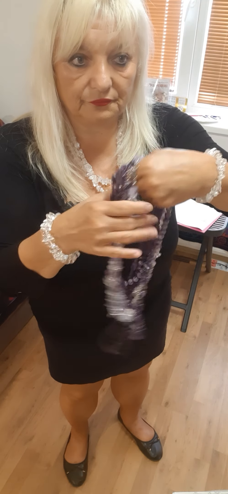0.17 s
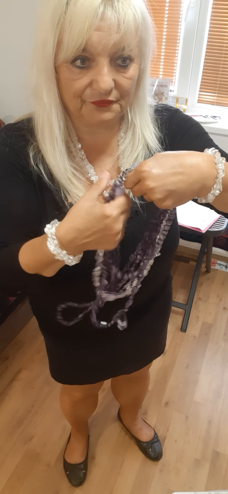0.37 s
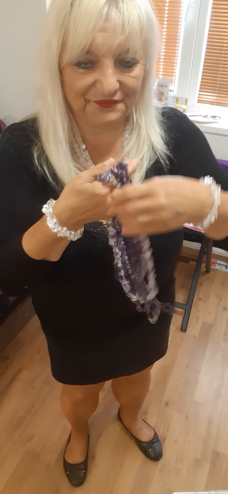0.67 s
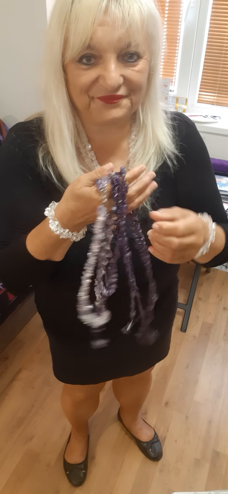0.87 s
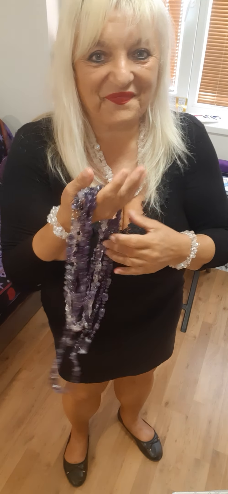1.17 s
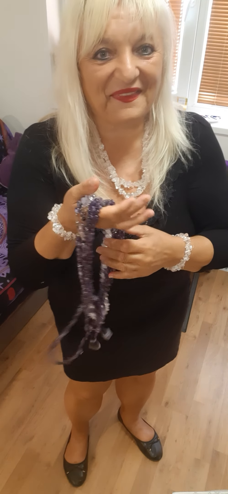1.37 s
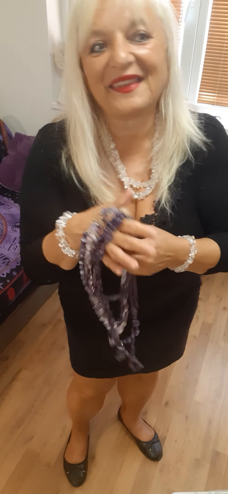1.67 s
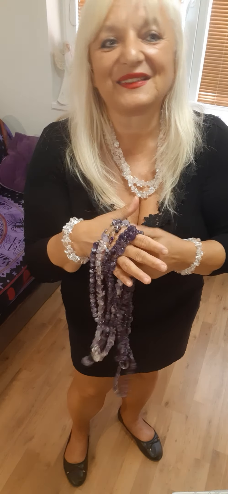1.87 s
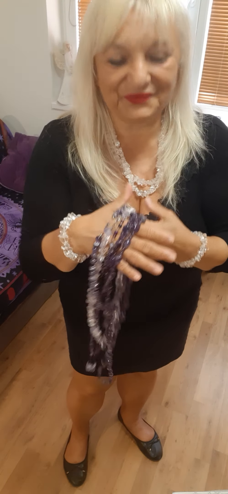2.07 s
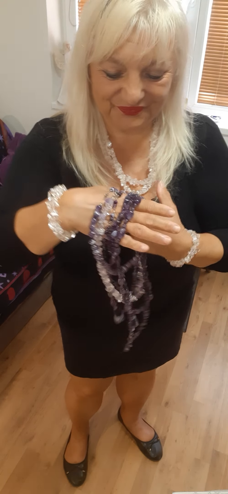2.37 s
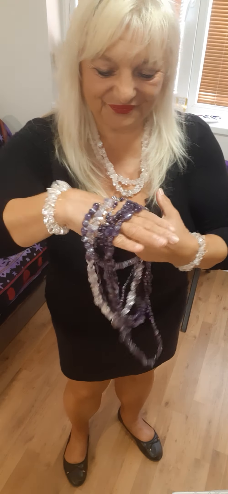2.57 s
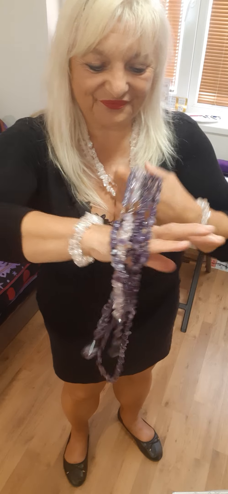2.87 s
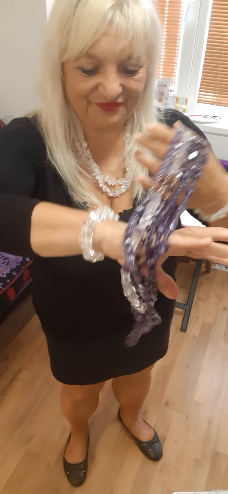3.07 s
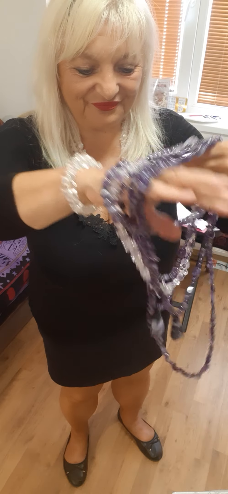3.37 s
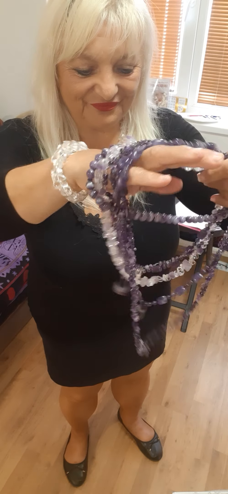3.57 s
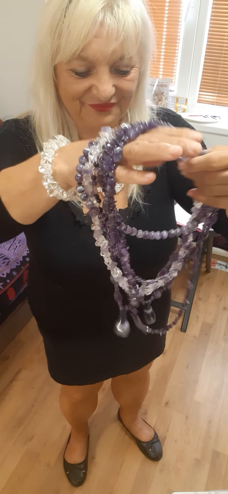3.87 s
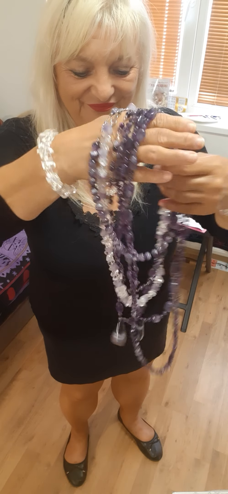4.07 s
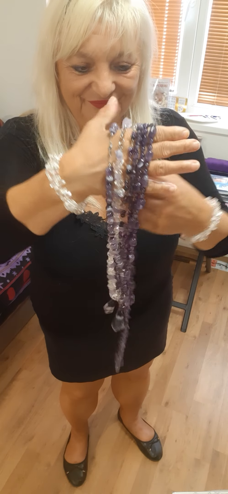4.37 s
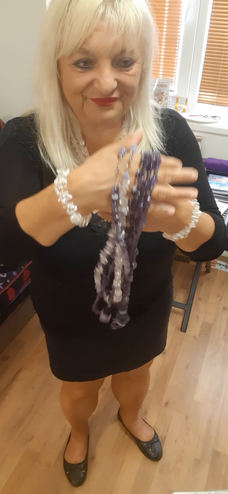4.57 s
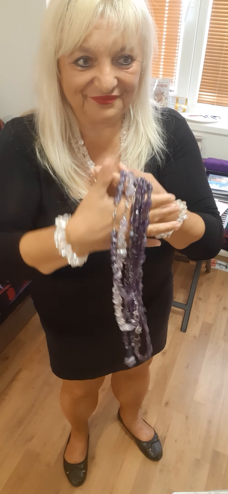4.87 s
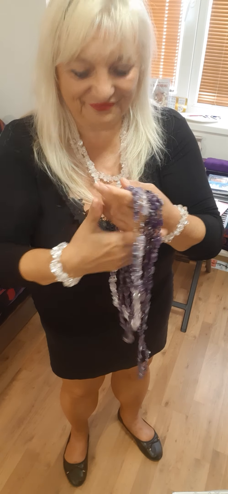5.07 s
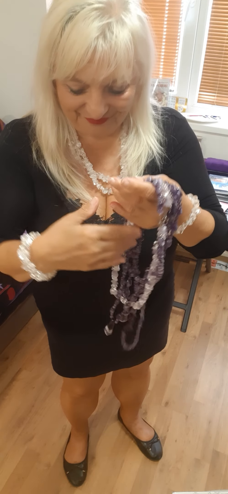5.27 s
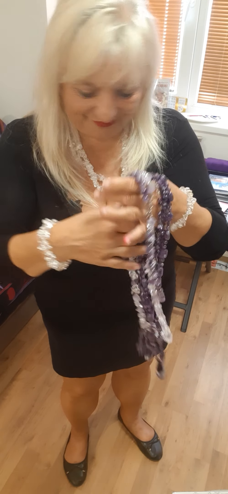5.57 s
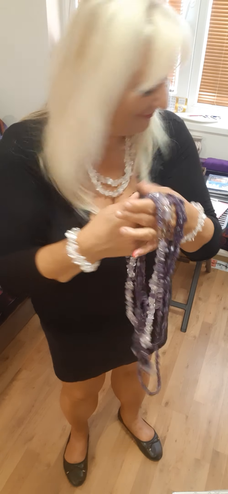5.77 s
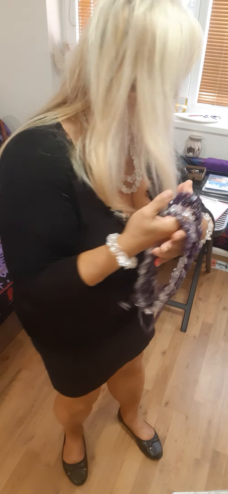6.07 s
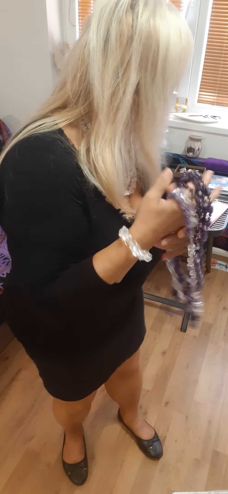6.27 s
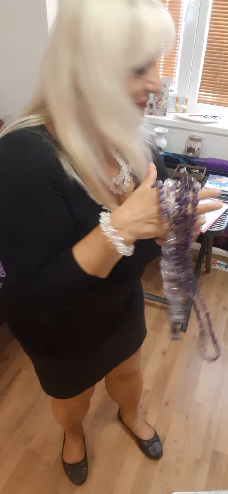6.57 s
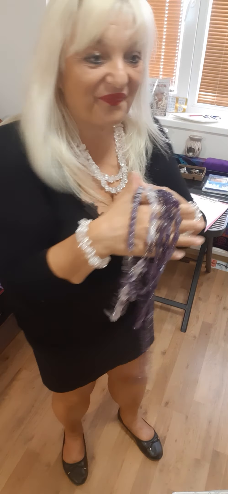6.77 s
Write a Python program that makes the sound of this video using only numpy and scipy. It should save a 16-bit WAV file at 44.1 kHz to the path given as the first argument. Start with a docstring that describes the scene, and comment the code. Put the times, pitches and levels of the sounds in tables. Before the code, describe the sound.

Strands of small stone beads rattle and clink brightly from hand to hand, close up in a quiet, lightly echoing living room.

```python
"""Strands of small stone beads are passed from hand to hand in a quiet living room, close to a phone.
Sliding over the fingers and swinging give a rattle of many tiny contacts, with harder clinks among them.
Each contact is a sharp tick with short rings and scattered noise; a metal clasp pings as a sum of sines.
Arms rub softly over cloth as shaped noise; room echoes and a low rumble of coloured noise lie behind."""
import sys
import numpy as np
from scipy import signal
from scipy.fft import rfft, irfft, next_fast_len
from scipy.io import wavfile

SR = 44100
rng = np.random.default_rng(int(sys.argv[2]) if len(sys.argv) > 2 else 0)


def log_audio(samples):
    """Write samples as a 16-bit WAV file to the path given in sys.argv[1]."""
    # one column per channel
    frames = np.atleast_2d(samples).T
    # limit to full scale, then quantise
    limited = np.clip(frames, -1, 1)
    pcm = np.round(limited * 32767).astype(np.int16)
    wavfile.write(sys.argv[1], SR, pcm)


N = 304272  # length of the scene in samples

# swings that throw the strands against each other: start t/s, length/s, rattle level/dB, heft/dB
# (heft is the extra weight of big stones)
STRAND_SWINGS = [(0.241, 0.039, -38.5, 5), (.403, 0.18, -46.5, 2), (0.688, 0.049, -40, 11.5),
                 (0.988, 0.13, -40.5, 1), (1.594, 0.21, -46, 0.5), (1.871, 0.17, -45, -2.5),
                 (2.2, 0.069, -50.5, 16), (2.353, .032, -46, 1.5), (2.772, 0.018, -41, -2),
                 (2.976, 0.18, -53, -1), (3.11, 0.066, -49.5, 12.5), (3.28, 0.048, -56.5, 1),
                 (3.589, 0.016, -53.5, 2), (3.688, 0.043, -49, -4), (3.91, 0.29, -51, -2.5),
                 (4.135, 0.011, -46, 0), (4.342, .012, -44, -1), (4.533, 0.066, -52.5, 6),
                 (4.7, 0.082, -52, 0), (4.815, 0.064, -44.5, 0.5), (5.002, 0.14, -46, -0.5),
                 (5.287, 0.015, -44.5, -8), (5.594, 0.14, -51.5, 0.5), (5.793, 0.11, -43, -1.5),
                 (6.042, 0.071, -51, 11.5), (6.272, 0.032, -47, -4.5), (6.48, 0.015, -46.5, -5),
                 (6.761, 0.018, -38.5, 1)]
SWING_ATTACK_S = 0.036


def undb(db):
    """Turn decibels into gain."""
    return 10 ** (np.asarray(db) / 20)


def curve(rows, t, axis=1):
    """Read one column of a table at times t, with straight lines between its rows."""
    rows = np.array(rows)
    return np.interp(t, rows[:, 0], rows[:, axis])


def colour(points, hz):
    """Gain at the given frequencies, from a spectrum of (f/Hz, level/dB) points."""
    f, db = np.transpose(points)
    return undb(np.interp(np.log(hz + 1), np.log(f), db))


def noise(points, size=N):
    """Noise of a given colour, with an rms level of 1."""
    n = next_fast_len(size)
    spectrum = rfft(rng.standard_normal(n))
    spectrum *= colour(points, np.fft.rfftfreq(n, 1 / SR))
    x = irfft(spectrum, n)[:size]
    return x / x.std()


def room_tone(level_db=-76, pan_db=-3, alike_hz=300):
    """Steady low rumble of the room; its bass is more alike on the two sides than its treble."""
    # colour of the rumble: f/Hz, relative level/dB
    rumble_colour = [(20, -11), (45, -10), (60, 4), (85, 1.5), (150, 1), (200, -4.5), (350, -9.5),
                     (700, -11), (1500, -17.5), (4000, -22.5), (15000, -21.5)]
    mid, side = noise(rumble_colour), noise(rumble_colour)
    bass_filter = signal.butter(1, alike_hz, fs=SR, output="sos")
    side = side - .5 * signal.sosfilt(bass_filter, side)
    balance_db = np.array([[pan_db], [-pan_db]]) / 2
    return np.array([mid + side, mid - side]) * undb(level_db + balance_db)


def room_response(wet_db=-4.0, t60_s=0.56, gap_s=0.00052, early_db=-10, count=8, size=24000):
    """A few early bounces off floor and walls, together with a dense tail that dies away."""
    t = np.arange(size) / SR
    decay = np.exp(-np.log(1000) * t / t60_s)
    onset = np.clip(t / gap_s - .5, 0, 1)
    tail = rng.standard_normal(size) * decay * onset
    tail *= undb(wet_db) / np.linalg.norm(tail)
    bounces_s = rng.uniform(.005, .03, count)
    signs = rng.choice([-1, 1], count)
    tail[(bounces_s * SR).astype(int)] += undb(early_db) * signs / np.sqrt(count)
    return tail


def room(x, size=4096):
    """The beads keep moving, so about every tenth of a second their sound takes new paths to the walls."""
    out = np.zeros((2, N + SR))
    for start in range(0, N, size):
        for channel in range(2):
            wet = signal.fftconvolve(x[channel, start:start + size], room_response())
            out[channel, start:start + len(wet)] += wet
    return out[:, :N]


def rubs(edge_s=0.014, skirt_db=-14):
    """Hands and arms rub softly over cloth: one broad hump of noise with a little hiss above it."""
    # the rubs: start t/s, end t/s, level/dB before the fades, centre f/Hz, hiss relative to the hump/dB
    rub_rows = [(0.153, .605, -81.5, 277, -6), (3.038, 3.112, -72, 810, -13), (4.749, 5.094, -80, 310, -19),
                (6.024, 6.123, -64, 1060, -6.5)]
    t, out = np.arange(SR) / SR, np.zeros((2, N + SR))
    for start, end, db, hz, hiss_db in rub_rows:
        hump = [(hz / 4, -40), (hz / 2.0, skirt_db), (hz, 0),
                (hz * 1.75, max(hiss_db, skirt_db)), (hz * 3, hiss_db), (hz * 10, hiss_db - 35)]
        fade_in = np.clip(t / edge_s, 0, 1)
        fade_out = np.sqrt(np.clip(1 - t / (end - start), 0, 1))
        rustle = np.array([noise(hump, size=SR), noise(hump, size=SR)])
        out[:, int(start * SR):][:, :SR] += undb(db) * fade_in * fade_out * rustle
    return out[:, :N]


def clasp(pan_db=-4):
    """A small metal part rings thinly when a bead taps it: several pure tones, each with its own decay."""
    # tones of the clasp: f/Hz, relative level/dB, time to fall by 60 dB/s
    clasp_modes = [(7350, -11, 0.25), (9060, 0, 0.18), (14300, -5, 0.16), (15400, -3, 0.61)]
    # taps on the clasp: t/s, level/dB (the left side is then turned down by pan_db)
    tap_rows = [(3.922, -59.5), (4.154, -55), (4.166, -54)]
    out, t = np.zeros(N), np.arange(SR) / SR
    ping = sum(undb(db - 60 * t / t60) * np.sin(2 * np.pi * hz * t) for hz, db, t60 in clasp_modes)
    for start, db in tap_rows:
        out[int(start * SR):][:SR] += undb(db) * ping
    return out * undb([[pan_db], [0]])


def motion(t, settle_db_per_s=260, light_slide_db=-63, heft_per_db=0.11):
    """Rattle level and heft (dB) at times t: sliding plus swings that rise fast, hold and settle."""
    # sliding of the strands over the fingers: t/s, rattle level/dB
    slide_rows = [(0, -57.5), (.17, -47), (.6, -45.5), (1.21, -43), (1.55, -45.5), (1.86, -62), (2.08, -46),
                  (2.54, -50.5), (2.74, -68), (2.99, -74), (3.53, -53), (3.88, -72.5), (4.07, -54.5),
                  (4.87, -56.5), (5.37, -60), (5.82, -49.5), (6.24, -49.5), (6.9, -53.5)]
    start, length, db, swing_heft = np.transpose(STRAND_SWINGS)[:, :, None]
    age = t - start
    rise = np.clip(age / SWING_ATTACK_S, 0, 1)
    settle_db = settle_db_per_s * np.maximum(age - length, 0)
    swing_power = rise * undb(db - settle_db) ** 2
    slide_db = curve(slide_rows, t)
    slide_power = undb(slide_db) ** 2
    # faster sliding stirs bigger stones: heft is zero at light_slide_db and grows with the level
    slide_heft = heft_per_db * (slide_db - light_slide_db)
    power = slide_power + swing_power.sum(0)
    heft = (slide_power * slide_heft + (swing_power * swing_heft).sum(0)) / power
    return 10 * np.log10(power), heft


def contacts(times, db, heft_db, pan_db, ring_s=0.0038, ring=0.49, scatter=0.54,
             echo_s=0.000522, echo=0.25, size=512):
    """Stone meets stone: a sharp tick, three short rings of its own, and scatter off nearby beads."""
    # colour of a bead contact: f/Hz, relative level/dB
    stone_colour = [(300, -59), (1000, -27), (1700, -28.5), (2100, -24), (2800, -21.5), (3600, -12),
                    (4400, -6), (6500, -4), (7900, -2), (8600, -7.5), (10200, -4), (11300, 2.5), (14000, 4),
                    (15700, 5)]
    count, t, hz = len(times), np.arange(size) / SR, np.fft.rfftfreq(size, 1 / SR)
    chance = rng.standard_normal((count, size + 8))
    wave = scatter * chance[:, :size] * np.exp(-t / .0011)
    wave[:, 0] += 1  # the tick
    for k in range(3):
        pitch_hz = 11000 * np.exp(.28 * chance[:, size + k, None]).clip(.5, 1.9)
        t60_s = ring_s * np.exp(.35 * chance[:, size + 3 + k, None])
        wave += ring * np.cos(2 * np.pi * pitch_hz * t) * np.exp(-np.log(1000) * t / t60_s)
    # big stones knock with more weight, mostly between 2 and 6 kHz
    low_share = np.interp(hz, [1000, 2200, 4500, 11000], [0, 1.3, .8, 0])
    weight = undb(heft_db[:, None] * low_share)
    spectrum = rfft(wave) * colour(stone_colour, hz) * weight * (hz < 16500)
    # beads are too small to give off bass
    spectrum *= hz ** 3 / np.sqrt(hz ** 6 + 1400. ** 6)
    # each bead has its own time offset between the phone's two sound openings (ports)
    lag_s = 4e-5 + 5e-5 * chance[:, -1, None]
    # the right port also hears a near reflection
    reflection = 1 + echo * np.exp(-2j * np.pi * hz * echo_s)
    right = spectrum * np.exp(2j * np.pi * hz * lag_s) * reflection
    lead = size // 8  # room for sound that reaches the right port early
    place = (np.clip(times, 0, N / SR) * SR).astype(int)[:, None] + np.arange(size)
    out = []
    for port, side in ((spectrum, 1), (right, -1)):
        ticks = np.roll(irfft(port), lead, axis=1)
        # db sets the energy of each contact, whatever its colour
        gain = undb(db + side * pan_db / 2) / np.linalg.norm(ticks, axis=1)
        ticks *= gain[:, None]
        out.append(np.bincount(place.ravel(), ticks.ravel(), N + size)[lead:lead + N])
    return np.array(out)


def rattle(spread_db=3.0, heft_spread_db=2, pan_db=-3, count=2800):
    """Many light contacts, mostly tiny and a few strong, louder as the strands move faster."""
    chance = rng.random((count, 4))
    times = (np.arange(count) + 2 * chance[:, 0] - 1) * N / SR / count
    size_db = -spread_db * np.log(.05 + .95 * chance[:, 1])
    # strands catch and slip, so contacts come in little flurries; every swing also starts with a slip
    chance_slips = np.cumsum(rng.uniform(.012, .05, count))
    swing_slips = np.array(STRAND_SWINGS)[:, 0] + SWING_ATTACK_S / 2
    slips = np.sort(np.r_[chance_slips, swing_slips])
    since_s = times - np.r_[0, slips][np.searchsorted(slips, times)]
    size_db -= 260 * np.maximum(since_s, 0)  # fades by 260 dB per second after a slip
    # share out the energy so that the motion sets the overall level
    size_db -= 10 * np.log10(np.sum(undb(size_db) ** 2) / N)
    level_db, heft = motion(times)
    pan = pan_db + 4 * (2 * chance[:, 3] - 1)
    return contacts(times, level_db + size_db, heft + heft_spread_db * (2 * chance[:, 2] - 1), pan)


def light_clinks(db=-20, follow=0.63, at_rattle_db=-50, spread_db=1.3, heft_db=-5, heft_spread_db=3,
                 pan_db=-4, pan_spread_db=5.0, count=110):
    """Lesser clinks at chance moments, as (time, energy, heft, pan) rows; lively strands clink harder."""
    chance = rng.standard_normal((count, 3))
    times = (np.arange(count) + 2 * rng.random(count)) % count * N / SR / count
    energy_db = db + follow * (motion(times)[0] - at_rattle_db) + spread_db * chance[:, 0]
    heft = heft_db + heft_spread_db * chance[:, 1]
    pan = pan_db + pan_spread_db * chance[:, 2]
    return np.column_stack([times, energy_db, heft, pan])


def clinks(rebound_db=-5, pass_on_db=-11):
    """Knocks of swinging strands: each rebounds at once, then passes on to a neighbouring bead."""
    # the hardest clinks: t/s, energy of the first blow/dB, heft/dB, left minus right/dB
    hard_clinks = [(.0827, -10, -6, -5), (.1473, -10.5, -2.5, -3.5), (.1902, -8.5, 10.5, -3),
                   (.6793, -10.5, -19, -4), (.713, -8, -13, -4), (.7452, -5, -8, -2), (.7654, -7, -7, -2),
                   (1.0332, -8.5, -22, -1), (1.1676, -7.5, 3, -4), (1.2877, -8.5, -17, -3),
                   (1.3458, -1, 2, -5.5), (2.0497, -10.5, -2, -7.5), (2.2052, -6.5, 2, -6),
                   (2.6712, -17.5, -0.5, -3), (2.7028, -14, -5.5, -4), (2.9593, -19, 1.5, -6),
                   (3.112, -11.5, 11, -3), (3.3599, -11.5, -5.5, -3.5), (3.4053, -3, -4.5, -3),
                   (3.4522, -19, 7.5, -7), (3.6168, -18, -2, 3), (3.8303, -13.5, -1.5, -4.5),
                   (4.2849, -18.5, -17, 2), (4.516, -14, 4, -7.5), (4.6485, -11.5, 0.5, -1),
                   (4.8527, -11.5, 1, -4), (5.5998, -13, -7.5, -5), (5.7605, -9, -9.5, -5),
                   (5.9956, -13.5, -13, -10), (6.0258, -15.5, 7.5, -3), (6.6328, -12.5, -5, -3),
                   (6.6862, -10.5, 1, -3.5)]
    times, db, heft, pan = np.vstack([hard_clinks, light_clinks()]).T
    chance = rng.random((len(times), 2))
    rebound_s = .0003 + .0006 * chance[:, 0]
    pass_on_s = .001 + .004 * chance[:, 1]
    blows = ((0, 0), (rebound_s, rebound_db), (pass_on_s, pass_on_db))
    return sum(contacts(times + late, db + drop, heft, pan) for late, drop in blows)


def scene(clink_room_db=-1, dull_hz=6500, dull=1.0):
    """Beads, clasp and hands, their echoes off the walls, and the room's own rumble."""
    soft, hard = rattle() + clasp() + rubs(), clinks()
    # the clinks come from strands that hang free, in plain sight of the phone, so they are drier
    wet = room(soft + undb(clink_room_db) * hard)
    # the walls give back less of the top than of the sound below it
    dull_filter = signal.butter(1, dull_hz, fs=SR, output="sos")
    wet += dull * signal.sosfilt(dull_filter, wet)
    return soft + hard + wet + room_tone()


def record(dry, top_hz=15900):
    """A steep low-pass filter takes away the very top of the sound."""
    return signal.sosfilt(signal.ellip(12, .2, 70, top_hz, fs=SR, output="sos"), dry)


dry = scene()
out = record(dry)
log_audio(out)
```